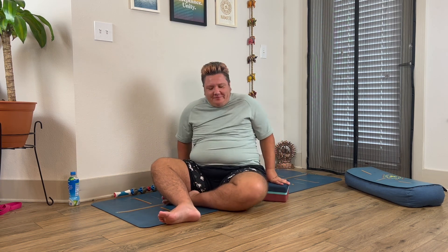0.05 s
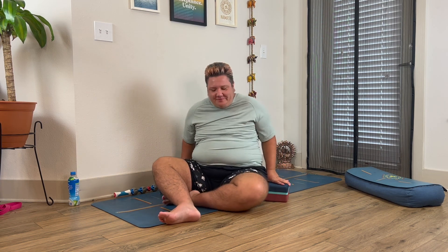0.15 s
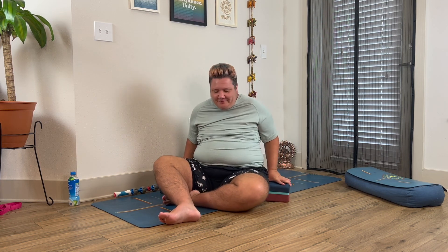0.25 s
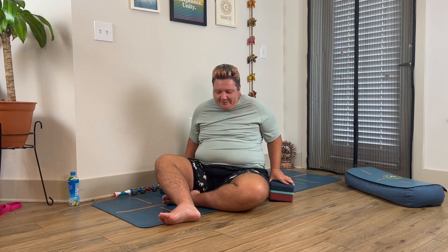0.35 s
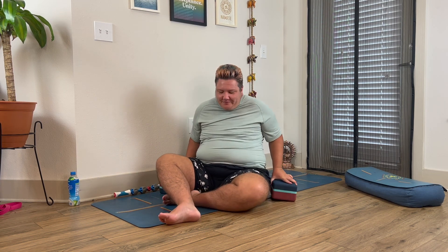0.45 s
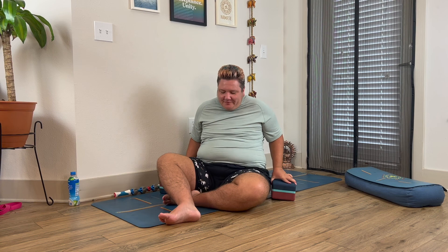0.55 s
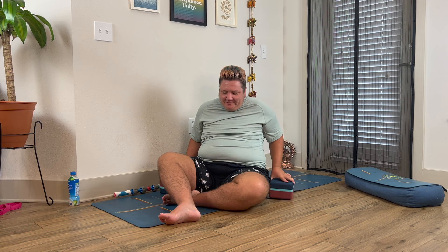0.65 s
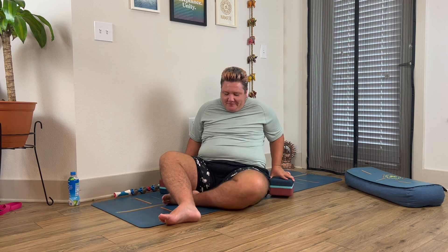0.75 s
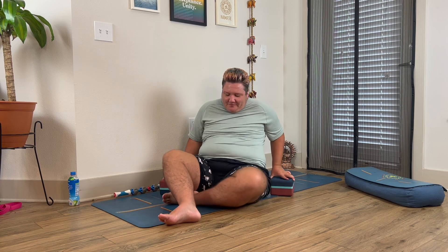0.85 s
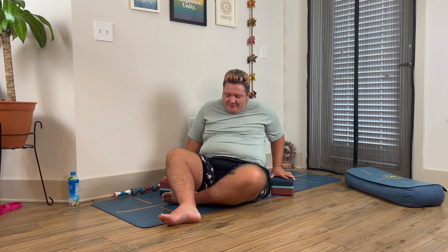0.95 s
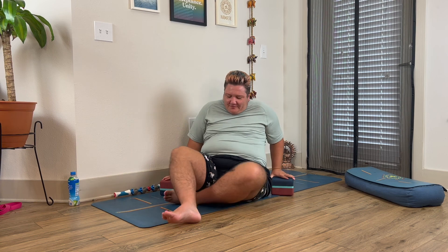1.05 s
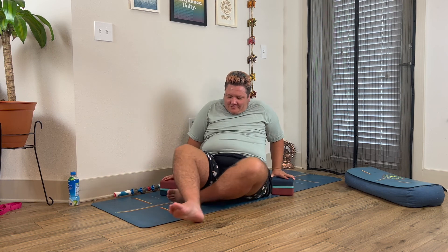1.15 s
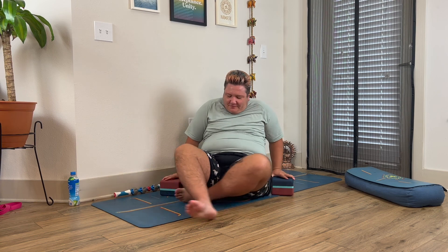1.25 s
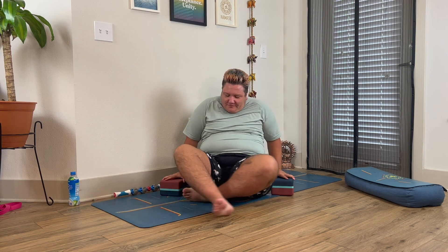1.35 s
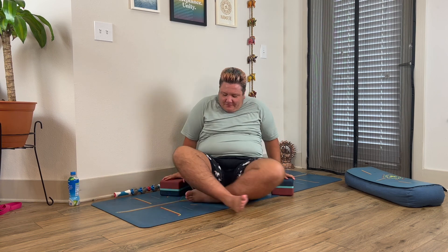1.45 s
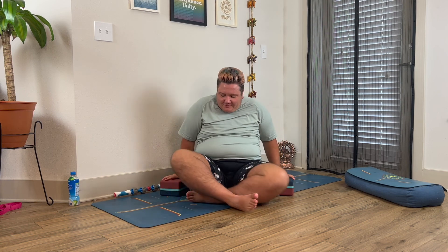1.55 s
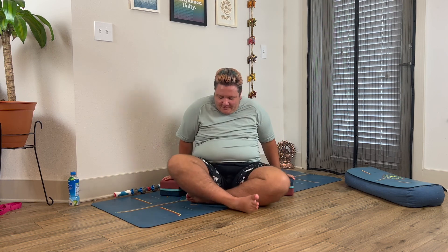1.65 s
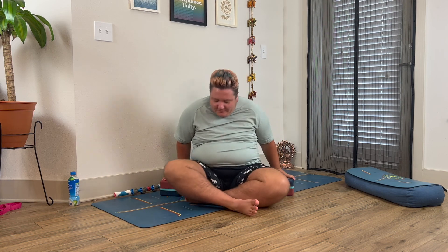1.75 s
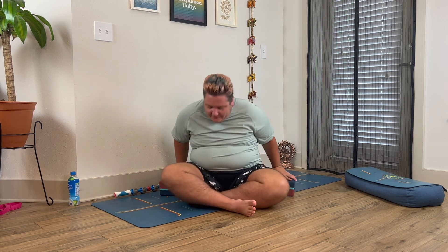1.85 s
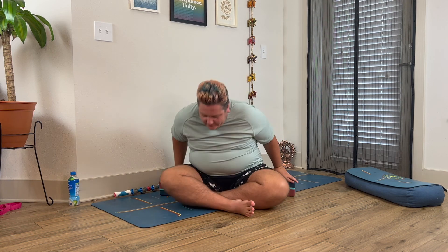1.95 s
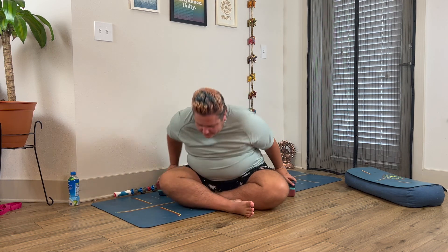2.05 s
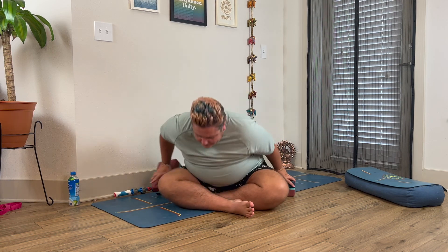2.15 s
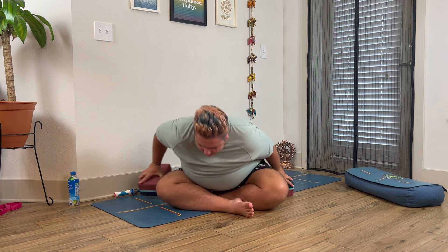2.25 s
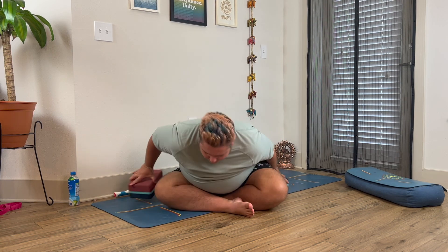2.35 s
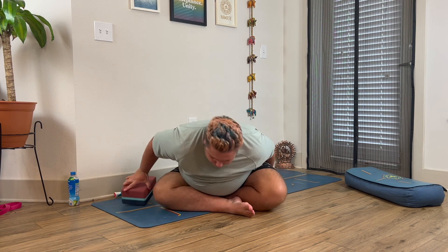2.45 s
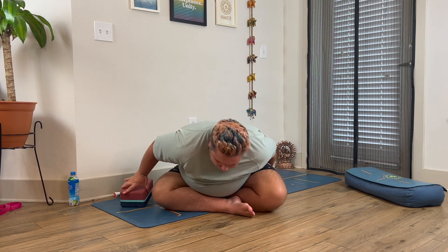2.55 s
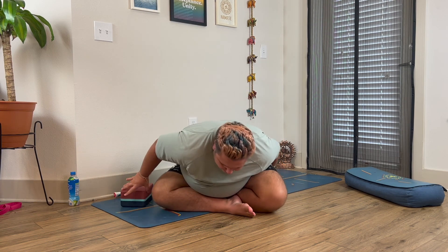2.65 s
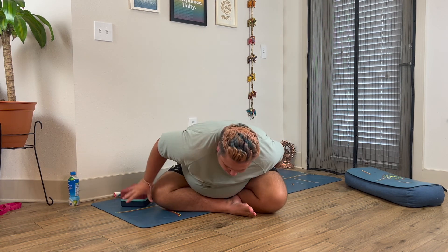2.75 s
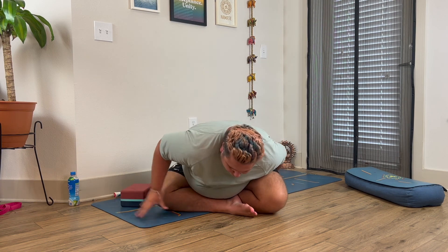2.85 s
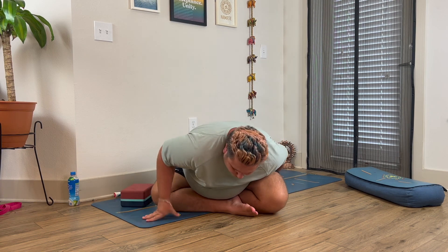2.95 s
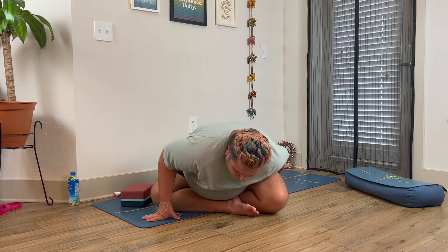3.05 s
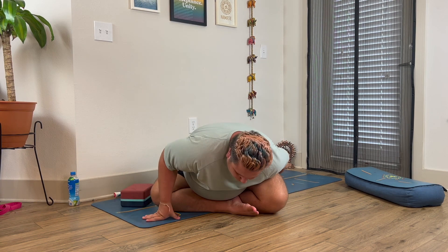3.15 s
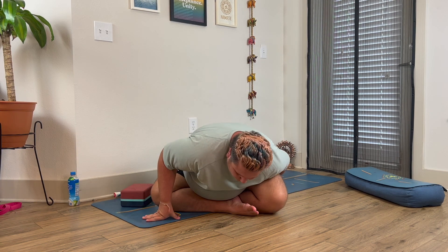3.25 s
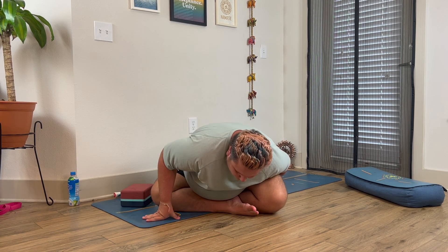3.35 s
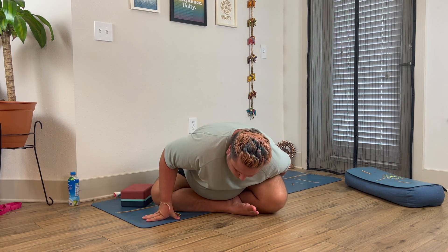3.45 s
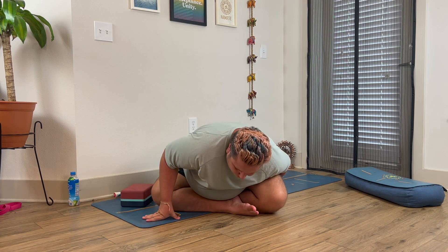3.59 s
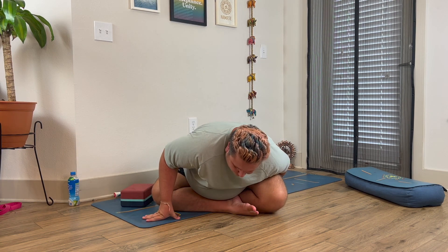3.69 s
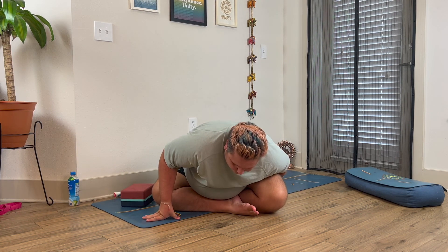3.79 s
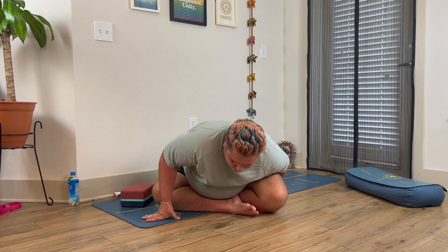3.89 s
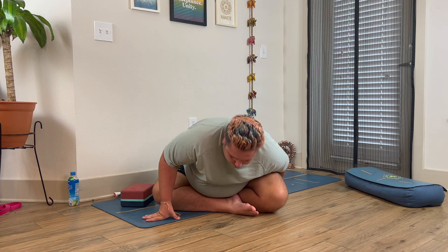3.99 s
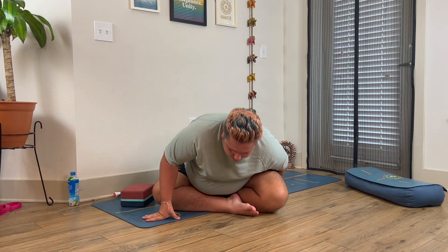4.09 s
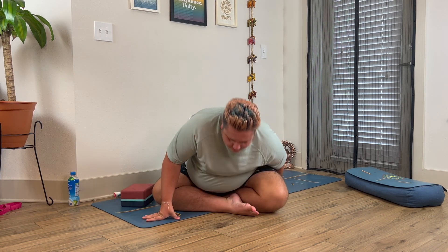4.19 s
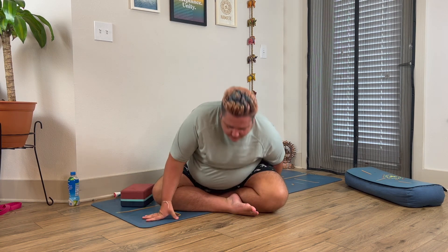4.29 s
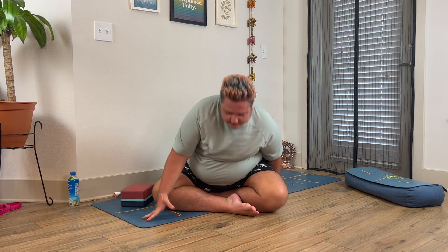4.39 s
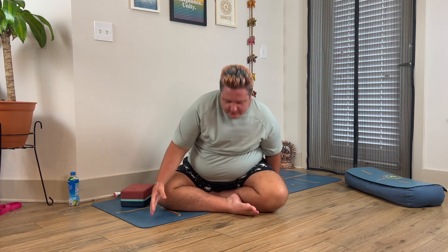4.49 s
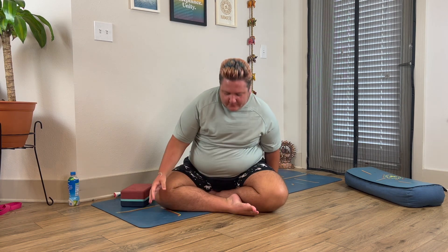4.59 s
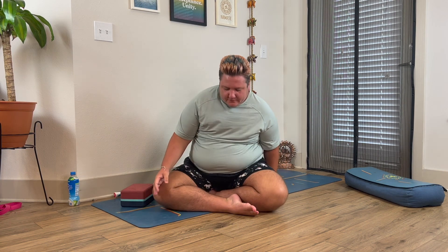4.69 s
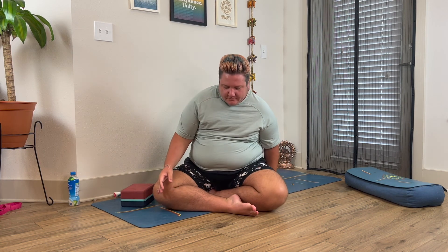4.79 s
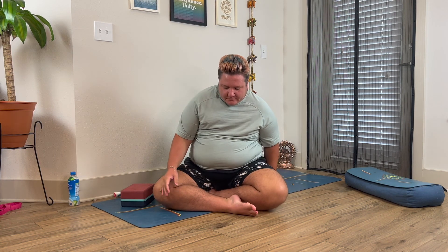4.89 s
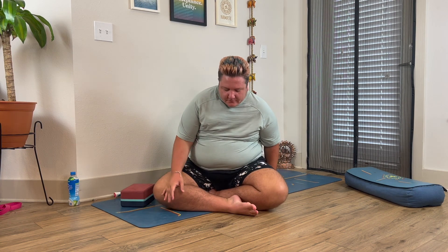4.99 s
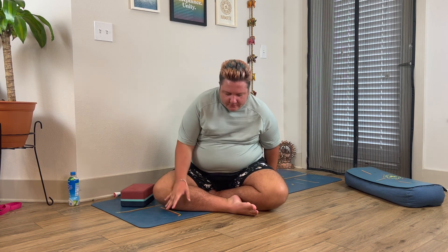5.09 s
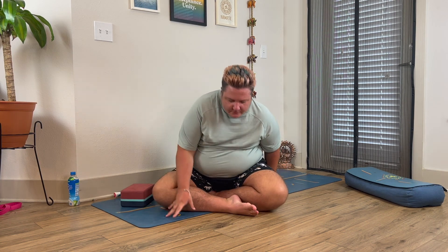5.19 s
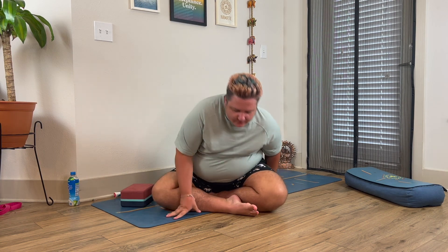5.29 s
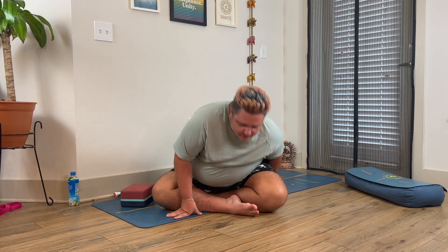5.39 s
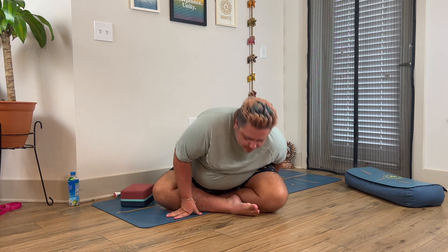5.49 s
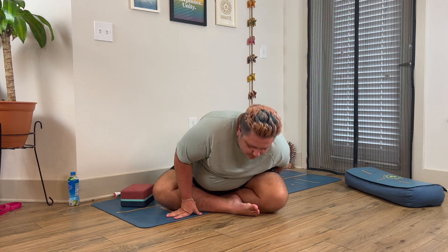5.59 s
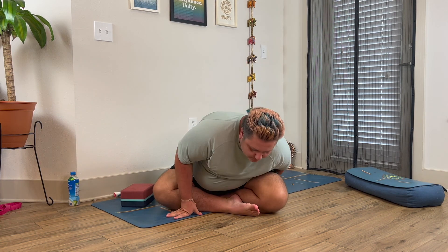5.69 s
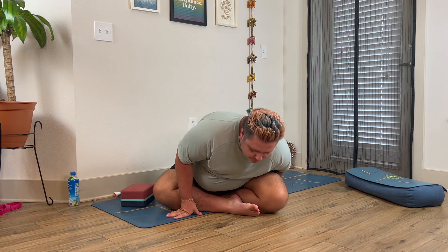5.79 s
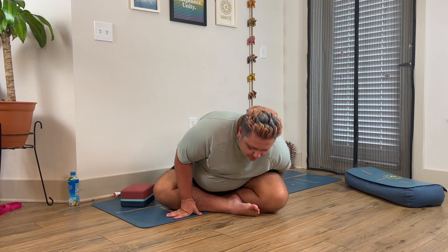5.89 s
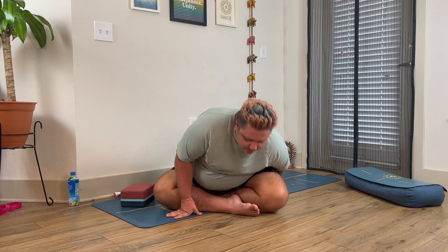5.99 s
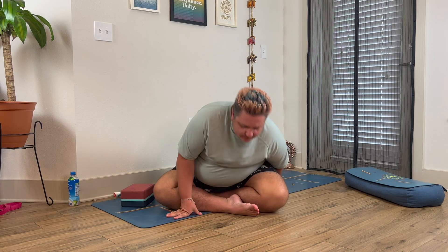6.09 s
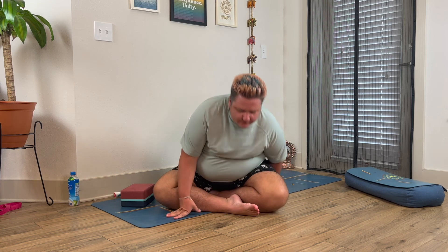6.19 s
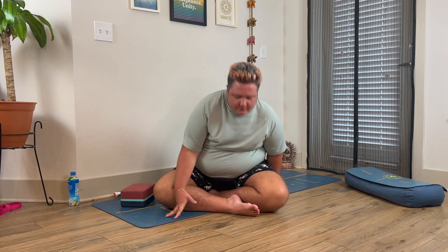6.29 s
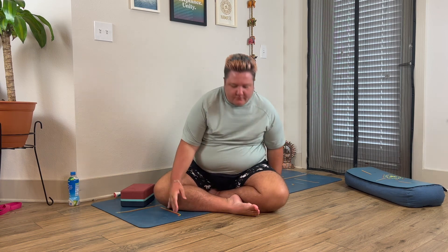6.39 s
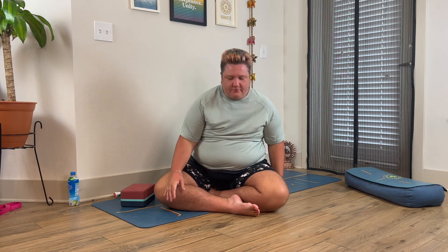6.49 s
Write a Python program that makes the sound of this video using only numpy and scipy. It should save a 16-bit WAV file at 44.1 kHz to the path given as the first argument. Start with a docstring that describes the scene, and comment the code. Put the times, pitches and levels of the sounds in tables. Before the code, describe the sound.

Someone shuffles on a padded mat in a small room, rustling and thumping, then drops a foam block with a hollow double thud.

```python
"""In a small quiet room, air conditioning rumbles and hums throughout: shaped noise and drifting sines.
Someone shifts on a padded mat on a wooden floor; skin and clothes rub from the start, as grainy noise.
Legs and seat then bump the floor in ringing modes, and skin lets go of the mat in short noise ticks.
A foam block is tipped and dropped on another, with boom, knock and a puff of noise; slow bends follow.
Two microphones listen from across the room."""
import sys
import numpy as np
from scipy import signal
from scipy.fft import rfft, irfft, next_fast_len
from scipy.io import wavfile
from scipy.ndimage import uniform_filter1d, map_coordinates

SR = 44100
rng = np.random.default_rng(int(sys.argv[2]) if len(sys.argv) > 2 else 0)


def dump(signal):
    """Clip the signal to [-1, 1] and save it as 16-bit WAV at the path in sys.argv[1]."""
    limited = np.clip(np.atleast_2d(signal).T, -1, 1)
    pcm = np.round(limited * 32767).astype(np.int16)
    wavfile.write(sys.argv[1], SR, pcm)


N = 288325

# Colour of the air rush. Each row: frequency in Hz, relative level in dB.
AIR_COLOUR = [(20, -8), (40, 2.5), (60, 3), (100, 0), (150, -7), (270, -9), (400, -15.5), (600, -20),
              (1200, -23), (3000, -29.5), (6000, -35.5), (10000, -44), (12500, -33.5), (15700, -54)]
# Steady hum tones. Each row: frequency in Hz, level in dB rms before drift.
HUM_TONES = [(59.3, -67.5), (239.5, -64), (242.0, -86.5)]
# Narrow hiss bands. Each row: centre in Hz, width to 1/e in Hz, level in dB rms before the left/right gains.
HISS_BANDS = [(1930, 320, -80), (6850, 530, -75.5)]

# Colour of rubbing on the mat. Each row: frequency in Hz, relative level in dB.
RUB_COLOUR = [(150, 0), (450, -10), (660, -8), (830, 2), (980, -2), (1350, 3.5), (1700, 0.5), (2100, 0),
              (3200, -3.5), (5000, -8), (10000, -46)]
# Colour of the shirt's fizz and of the ticks. Each row: frequency in Hz, relative level in dB.
FIZZ_COLOUR = [(1000, -6.5), (2500, -3), (4000, -2.5), (5400, 1.5), (7500, 2), (10000, -11), (12200, 1),
               (14000, -3), (15700, -2)]
# How much the body moves: shuffling into the seat, then two slow bends, each after a short rest.
# Each row: time in seconds, amount of motion in dB.
BODY_MOTION = [(0, -2), (.6, 0), (1.08, -6), (1.36, -3.5), (1.65, -8), (1.85, -2.5), (2.8, -2),
               (3.36, -4.5), (3.49, -24), (3.93, -25), (4.07, -13), (5.66, -12), (5.82, -25), (6.06, -12),
               (6.53, -6)]
# Single strokes of a leg, hand or block. Each row: fastest point in seconds, length in seconds,
# rub on the mat in dB, fizz of the shirt in dB.
LIMB_STROKES = [(0.302, 0.33, -53.5, -51), (0.788, 0.32, -50, -49), (1.009, 0.12, -55.5, -56.5),
                (1.245, 0.27, -59, -56.5), (1.495, 0.18, -56, -50), (1.91, 0.36, -48.5, -52),
                (2.123, 0.17, -54.5, -59), (2.242, 0.13, -50.5, -59.5), (2.528, 0.28, -49.5, -51.5),
                (2.635, 0.19, -45.5, -49), (2.933, 0.23, -53, -54.5), (3.274, 0.27, -55.5, -56.5),
                (3.59, 0.18, -67, -67), (4.662, 0.088, -89, -81), (4.94, 0.16, -93, -72),
                (5.23, 0.099, -88, -67), (6.35, 0.21, -94, -61.5)]
RUB_DB, FIZZ_DB = -50, -56.5  # mat and shirt at a motion of 0 dB
RUB_GROWTH = 2.42  # dB of rub per dB of motion: more motion also presses harder
STROKE_SHAPE = 1.08  # loudness goes as this power of the sliding speed

# Modes of the floor under the mat. Each row: frequency in Hz, relative level in dB, t60 in seconds.
FLOOR_MODES = [(62.7, -10.5, 0.43), (69, -5.5, 0.096), (82.2, 3.5, 0.15), (122.5, -10, 0.42)]
# Hollow modes of mat and room corner. Each row: frequency in Hz, relative level in dB, t60 in seconds.
KNOCK_MODES = [(118, -13.5, 0.26), (167, -10, 0.069), (188.5, 2.5, 0.11), (235.4, -3.5, 0.15),
               (299.5, -0.5, 0.088), (341.4, -5.5, 0.18), (366.5, -1, 0.072), (409, -8, 0.2),
               (442, -3.5, 0.092)]
# Colour of a slap in the room. Each row: frequency in Hz, relative level in dB.
SLAP_COLOUR = [(200, 3.5), (420, -1.5), (540, -2), (700, 1), (830, -0.5), (960, -2.5), (1300, -6),
               (1700, -12.5), (2400, -16.5), (3500, -28), (6000, -34), (9000, -39), (16000, -66)]
# Legs and seat bump the padded floor. Each row: start in seconds, floor boom in dB before the mix trim,
# hardness as knock over boom in dB before the trims.
FLOOR_BUMPS = [(0.787, -35, 4), (0.827, -31.5, 3), (0.850, -28, -1.5), (0.906, -31.5, -13.5),
               (1.008, -42.5, -39), (1.198, -53, -10), (1.832, -47.5, -5.5), (1.855, -44, -43),
               (1.910, -41.5, -38), (1.941, -38, -20), (2.395, -25, -23), (2.462, -30.5, -17),
               (2.515, -34.5, -11.5), (3.002, -44.5, -21), (3.055, -41, -37)]
# Flat faces land or scuff, of a block or of the palm. Each row: start in seconds, then floor boom,
# knock and slap, each in dB before the mix trim.
FLAT_CONTACTS = [(2.278, -45.5, -52, -59), (2.37, -53, -42, -43), (2.595, -24, -15.5, -20.5),
                 (2.6265, -15.5, -17.5, -23.5), (2.851, -71, -48, -38.5), (5.187, -86, -65, -65.5),
                 (6.285, -63, -76, -66)]
BUMP_SLAP_DB = -18.5  # slap over knock for a rounded limb, before the trims
BOOM_TRIM_DB, KNOCK_TRIM_DB, SLAP_TRIM_DB = -2.5, -6, -2.0

# Crisp ticks of skin catching on the mat. Each row: start in seconds, starting level in dB rms.
SKIN_TICKS = [(1.449, -45), (2.244, -46), (3.549, -64), (4.253, -56.5), (6.097, -62)]

# How long the room rings. Each row: frequency in Hz, t60 in seconds.
ROOM_DECAY = [(60, 0.78), (250, 0.38), (800, 0.52), (2500, 0.56), (6000, 0.75), (15000, 0.12)]
# Likeness of the two microphones. Each row: frequency in Hz, left-right correlation.
MIC_LIKENESS = [(60, .97), (130, .92), (250, .65), (500, .3), (1200, .2), (4000, .15), (8500, 0),
                (9400, -.98), (10600, -.98), (11400, .2), (13000, .97), (14200, .97), (15600, 0)]
# Balance of the two microphones. Each row: frequency in Hz, left over right in dB.
MIC_BALANCE = [(60, -1.2), (140, -.7), (300, -1.6), (700, -.3), (2800, .3), (4200, 5), (5800, 7.5),
               (7200, 4), (9000, 0)]
LOW_HZ, TOP_HZ = 47.7, 15719  # limits of the recorder's band


def amp(db):
    """Decibels to gain."""
    return 10 ** (np.asarray(db) / 20)


def unit(x):
    """Scale to rms 1."""
    return x / np.sqrt(np.mean(x ** 2) + 1e-20)


def along(points, hz):
    """Read (Hz, value) points on a log frequency axis."""
    f, v = np.transpose(points)
    return np.interp(np.log(hz + 1), np.log(f + 1), v)


def curve(rows):
    """Join (seconds, value) rows into one value per sample."""
    return np.interp(np.arange(N) / SR, *np.transpose(rows))


def wobble(rate):
    """A smooth random curve, rate knots a second."""
    knots = rng.standard_normal(int(N * rate / SR) + 4)
    return map_coordinates(knots, [np.arange(N) * rate / SR])


def filtered(x, response):
    """Shape x by a response given as a function of frequency."""
    n = x.shape[-1]
    m = next_fast_len(n + 8192)
    spectrum = rfft(x, m) * response(np.fft.rfftfreq(m, 1 / SR))
    return irfft(spectrum, m)[..., :n]


def coloured(x, colour):
    """Shape x by a colour table, at rms 1."""
    return unit(filtered(x, lambda hz: amp(along(colour, hz))))


def room_tail():
    """Two unrelated noise tails, the first of energy 1; each frequency dies at its own speed."""
    hz, t, grid = signal.stft(rng.standard_normal((2, SR)), SR, nperseg=256)
    fade = amp(-60 * t / along(ROOM_DECAY, hz)[:, None])
    tail = signal.istft(grid * fade, SR, nperseg=256)[1][:, :SR]
    return tail / np.linalg.norm(tail[0])


def in_room(x, wet_db):
    """The direct sound in the first row, and the room's answer in both."""
    answer = amp(wet_db) * signal.fftconvolve(x[None], room_tail(), axes=1)[:, :len(x)]
    return answer + np.array([x, np.zeros_like(x)])


def air_conditioning():
    """A low rush of air, and motor hum whose close tones beat slowly."""
    t = np.arange(N) / SR
    air = amp(-59.5) * coloured(rng.standard_normal((2, N)), AIR_COLOUR)
    hum = np.zeros(N)
    for hz, db in HUM_TONES:
        # level and phase both wander a little
        drift = amp(.6 * wobble(5)) * np.exp(.2j * wobble(3))
        tone = (drift * np.exp(2j * np.pi * hz * t)).real
        hum += amp(db) * np.sqrt(2) * tone
    return air + np.array([hum, np.zeros(N)])


def hiss():
    """Faint steady hiss: noise through narrow bell-shaped bands."""
    out = np.zeros(N)
    for centre_hz, width_hz, db in HISS_BANDS:
        band = filtered(rng.standard_normal(N), lambda hz: np.exp(-((hz - centre_hz) / width_hz) ** 2))
        out += amp(db) * unit(band)
    return out


def friction(colour, grain_rate, grain_db, patchy_db):
    """Fibres slip in a dense rush whose colour shifts with the contact; single catches stand out."""
    grid = signal.stft(rng.standard_normal((2, N)), nperseg=512)[2]
    # smooth random gains over frequency, then over time
    patches = uniform_filter1d(rng.standard_normal(grid.shape[1:]), size=4, axis=0)
    patches = uniform_filter1d(patches, size=12, axis=1)
    rush = signal.istft(grid * amp(patchy_db * unit(patches)), nperseg=512)[1][:, :N]
    # sparse random clicks, grain_rate a second, heard mostly by way of the room
    catches = (rng.random(N) < grain_rate / SR) * rng.standard_normal(N)
    grains = unit(in_room(catches, wet_db=20))
    return coloured(unit(rush) + amp(grain_db) * grains, colour)


def stroke(middle, length):
    """A slide speeds up and slows down again in one smooth arch."""
    phase = np.clip((np.arange(N) / SR - middle) / length, -.5, .5)
    return np.abs(np.cos(np.pi * phase)) ** STROKE_SHAPE


def rustle():
    """Mat rub and shirt fizz follow the body's motion; single strokes swell above, slightly uneven."""
    motion_db = curve(BODY_MOTION)
    rub = amp(RUB_DB + RUB_GROWTH * motion_db)
    fizz = amp(FIZZ_DB + motion_db)
    for middle, length, rub_db, fizz_db in LIMB_STROKES:
        arch = stroke(middle, length)
        rub = np.hypot(rub, amp(rub_db) * arch)
        fizz = np.hypot(fizz, amp(fizz_db) * arch)
    uneven = amp(.7 * wobble(35))
    mat = rub * friction(RUB_COLOUR, grain_rate=240, grain_db=-2.0, patchy_db=4.0)
    shirt = fizz * friction(FIZZ_COLOUR, grain_rate=650, grain_db=-11.5, patchy_db=2.9)
    return uneven * (mat + shirt)


def early_rms(x):
    """The rms of a blow over its first 30 ms."""
    return np.sqrt(np.mean(x[:int(.03 * SR)] ** 2))


def ring(modes, t, attack, scatter_db):
    """Damped modes, struck a little differently each time; a soft contact starts them slowly."""
    waves = np.zeros(len(t))
    for hz, db, t60 in modes:
        struck_db = db + scatter_db * rng.standard_normal()
        waves += amp(struck_db - 60 * t / t60) * np.sin(2 * np.pi * hz * t)
    waves *= 1 - np.exp(-t / attack)
    return waves / early_rms(waves)


def slap(t, attack, t60, build, wet_db):
    """Flat foam faces squeeze out a puff of air; the room's wash builds up behind it."""
    puff = rng.standard_normal(SR) * (1 - np.exp(-t / attack)) * amp(-60 * t / t60)
    pair = amp(wet_db) * room_tail() * (1 - np.exp(-t / build))
    pair[0] += puff / np.linalg.norm(puff)
    pair = coloured(pair, SLAP_COLOUR)
    return pair / early_rms(pair[0])


def blows():
    """Each contact booms in the floor, knocks, and slaps with a puff of air."""
    out, t = np.zeros((2, N + SR)), np.arange(SR) / SR
    bumps = []
    for start, boom_db, hard_db in FLOOR_BUMPS:
        knock_db = boom_db + hard_db
        bumps.append((start, boom_db, knock_db, knock_db + BUMP_SLAP_DB))
    for start, boom_db, knock_db, slap_db in bumps + FLAT_CONTACTS:
        # a gentler blow stirs less of the high modes
        tilt_db = 0.18 * (knock_db + 13)  # per octave
        stirred = [(hz, db + tilt_db * np.log2(hz), t60) for hz, db, t60 in KNOCK_MODES]
        # the higher the sound, the more of it arrives by way of the walls
        boom = in_room(ring(FLOOR_MODES, t, attack=0.0025, scatter_db=3.0), wet_db=-12)
        knock = in_room(ring(stirred, t, attack=0.0063, scatter_db=1.2), wet_db=-4.5)
        puff = slap(t, attack=0.013, t60=0.072, build=0.008, wet_db=2.0)
        blow = amp(boom_db + BOOM_TRIM_DB) * boom
        blow += amp(knock_db + KNOCK_TRIM_DB) * knock
        blow += amp(slap_db + SLAP_TRIM_DB) * puff
        out[:, round(start * SR):][:, :SR] += blow
    return out[:, :N]


def ticks():
    """Skin lets go of the mat with a short bright snap of fading noise."""
    out, t = np.zeros(N + SR), np.arange(SR) / SR
    for start, db in SKIN_TICKS:
        snap = coloured(rng.standard_normal(SR), FIZZ_COLOUR)
        out[round(start * SR):][:SR] += amp(db - 60 * t / 0.043) * snap  # t60 of 43 ms
    return in_room(out[:N], wet_db=0.5)


def microphones(pair):
    """Two unrelated rows become left and right: alike in the bass, opposed in one treble band."""
    def shares(hz):
        # this angle between mid and side gives the wanted correlation
        angle = np.arccos(np.clip(along(MIC_LIKENESS, hz), -1, 1)) / 2
        return np.array([np.cos(angle), np.sin(angle)])

    mid, side = filtered(pair, shares)
    left_right = np.array([mid + side, mid - side])
    return filtered(left_right, lambda hz: amp(np.outer([.5, -.5], along(MIC_BALANCE, hz))))


def scene():
    """Steady air, rustle, blows and ticks reach the microphones; hiss joins, mostly on the left."""
    heard = microphones(air_conditioning() + rustle() + blows() + ticks())
    return heard + hiss() * amp([[3], [-14]])


def record(dry):
    """The recorder sheds the deepest bass and keeps nothing above its band limit."""
    low_cut = signal.butter(4, LOW_HZ, "highpass", fs=SR, output="sos")
    return filtered(signal.sosfilt(low_cut, dry), lambda hz: hz < TOP_HZ)


dry = scene()
out = record(dry)
dump(out)
```